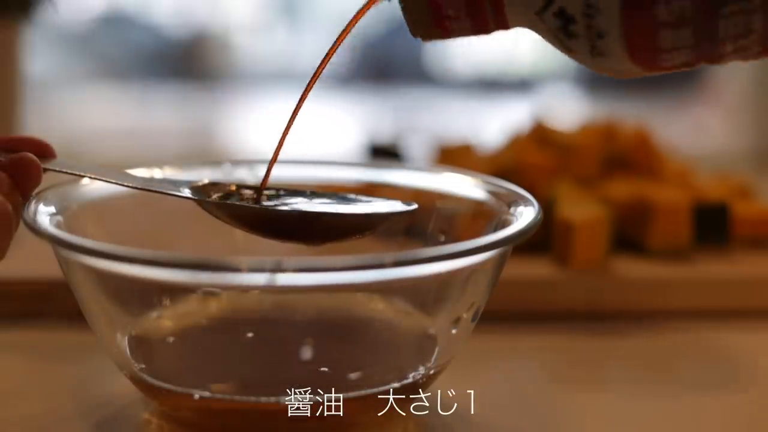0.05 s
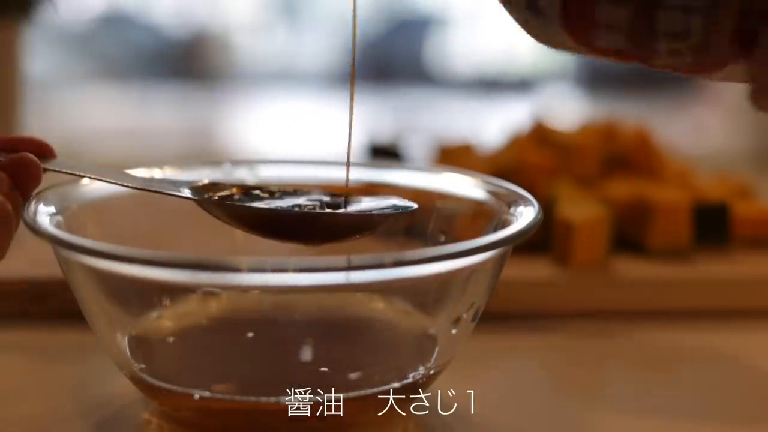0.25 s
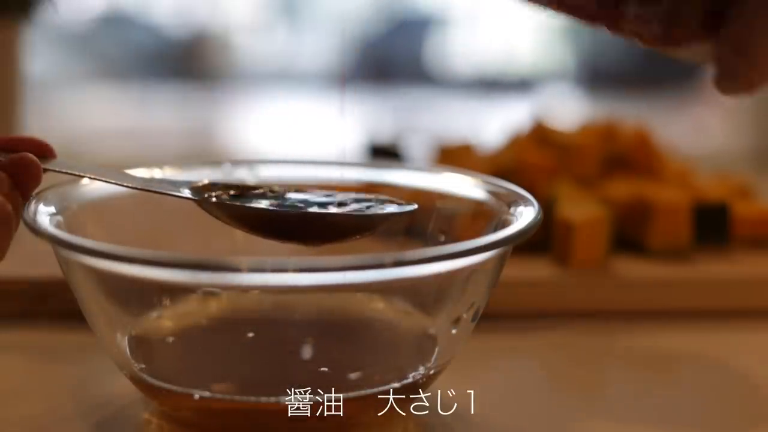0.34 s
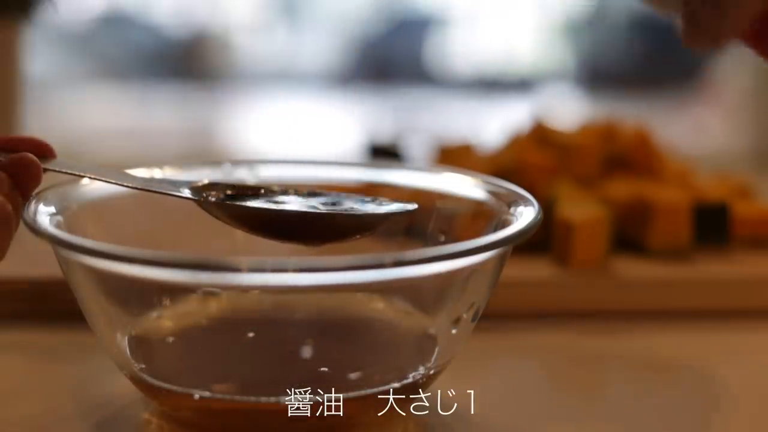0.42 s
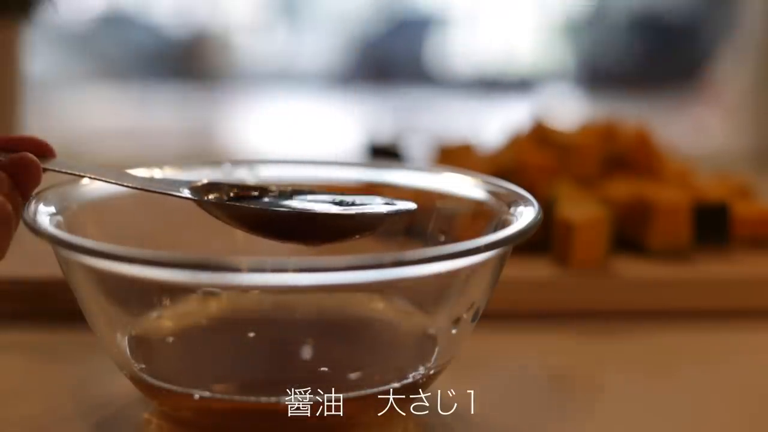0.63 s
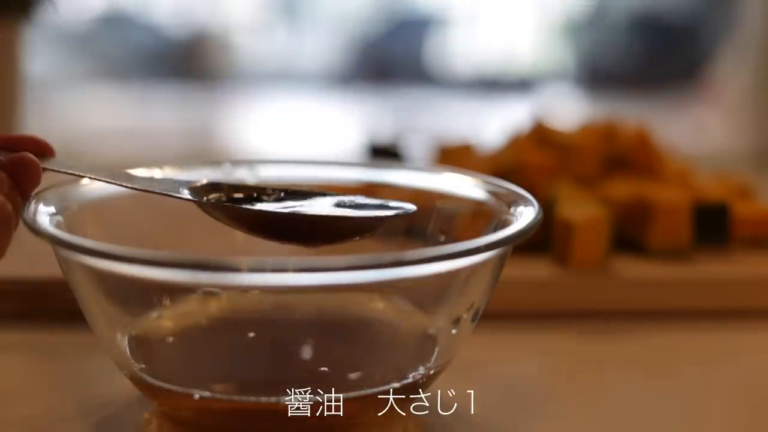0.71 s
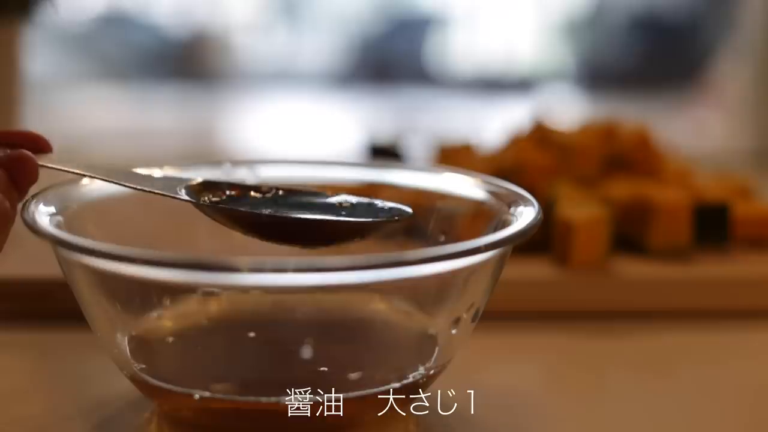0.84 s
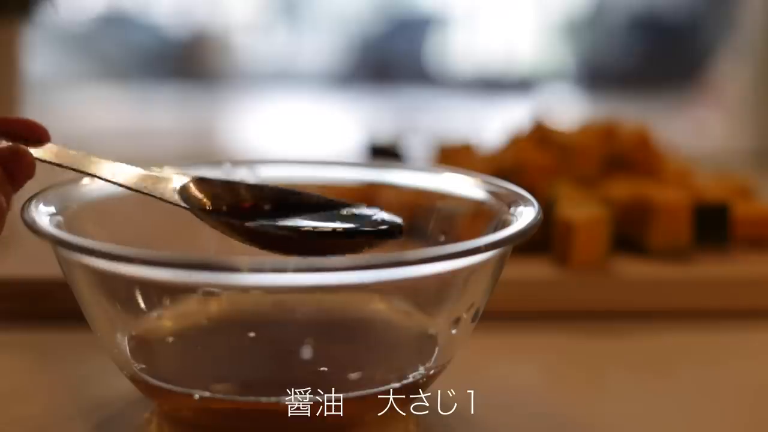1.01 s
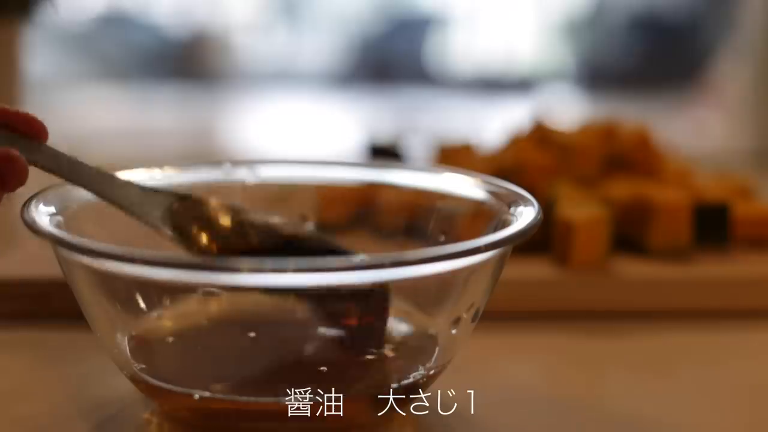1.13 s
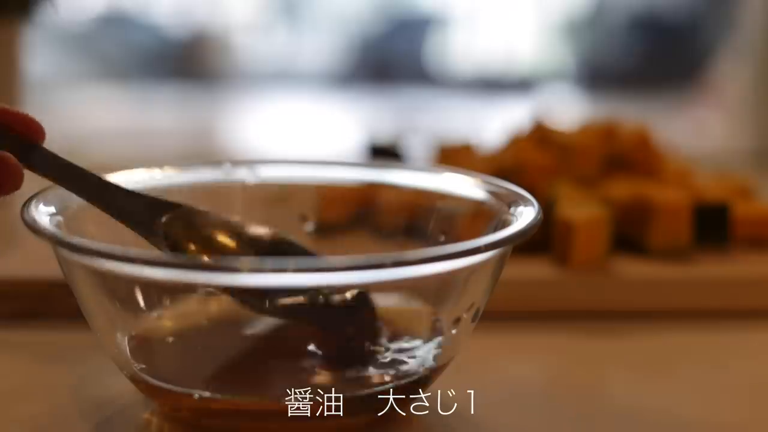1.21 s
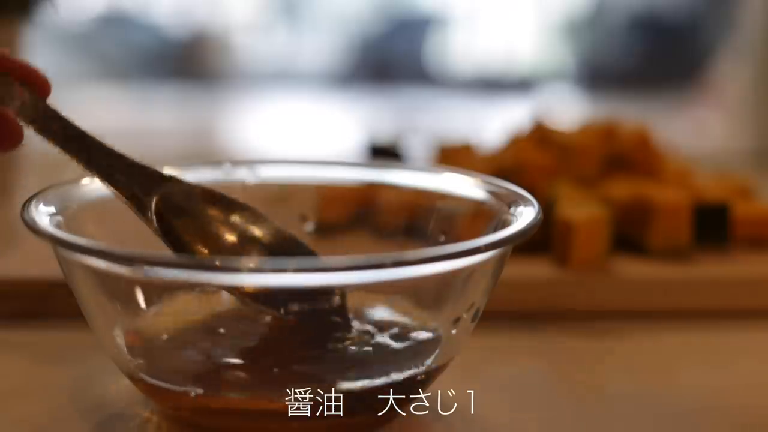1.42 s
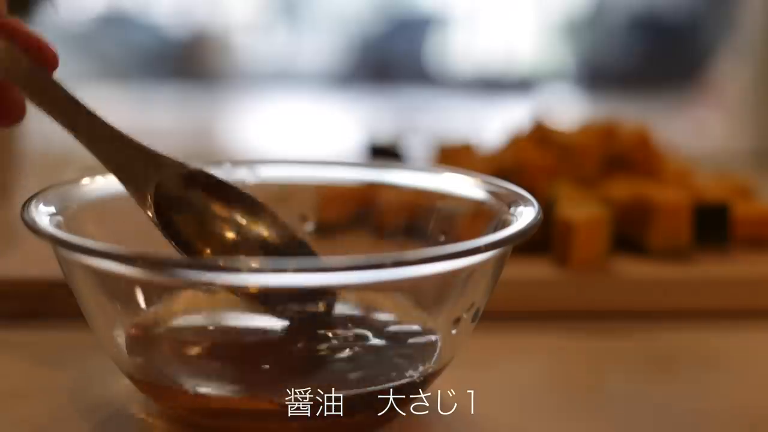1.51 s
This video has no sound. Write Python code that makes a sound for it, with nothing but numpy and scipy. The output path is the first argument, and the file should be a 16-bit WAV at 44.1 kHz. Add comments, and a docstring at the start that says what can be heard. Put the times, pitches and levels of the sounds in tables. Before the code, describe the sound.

Sauce drips wetly into a metal spoon, then the spoon ticks lightly on a glass bowl.

```python
"""First come quick, wet drips: sauce poured into a metal spoon over a glass bowl in a quiet kitchen.
The thinning stream breaks into drips: each lands with a tiny splash and traps a bubble that rings briefly.
The spoon ticks lightly on the glass twice, and at the second tick the spoonful is tipped into the bowl.
Worktop and walls echo these sounds, over a faint appliance hum."""
import sys
import numpy as np
from scipy import signal
from scipy.fft import rfft, irfft
from scipy.io import wavfile

SR = 44100
rng = np.random.default_rng(int(sys.argv[2]) if len(sys.argv) > 2 else 0)


def file_out(sig):
    """Save sig as 16-bit WAV at sys.argv[1]."""
    # one column per channel
    cols = np.atleast_2d(sig).T
    # limit, then scale
    lim = np.clip(cols, -1, 1)
    pcm = np.round(lim * 32767).astype(np.int16)
    wavfile.write(sys.argv[1], SR, pcm)


N = 68355
T = np.arange(N) / SR
HZ = np.maximum(np.fft.rfftfreq(2 * N, 1 / SR), 1)
SIDE = np.array([[1], [-1]])   # add on the left, subtract on the right: widens a sound


def from_db(db):
    """Turn decibels into a factor to multiply by."""
    return 10 ** (np.asarray(db) / 20)


def rms_one(x):
    """Scale a sound so its average strength (rms) is 1."""
    return x / np.sqrt(np.mean(x ** 2) + 1e-20)


def fade(fade_s):
    """A smooth die-away. Every fade time here is the time taken to drop by 60 dB."""
    return np.exp(-np.minimum(np.log(1000) * T / max(fade_s, 1e-4), 30))


def at_hz(table, hz, column=1):
    """Look up a frequency in a table, blending between rows on a pitch scale."""
    table = np.array(table)
    return np.interp(np.log(hz), np.log(table[:, 0]), table[:, column])


def shaped(x, gain):
    """Turn each frequency in HZ up or down by its gain."""
    return irfft(rfft(x, 2 * N) * gain)[:N]


def noise(gain):
    """Steady noise of strength 1, its tone set by the gains."""
    return rms_one(shaped(rng.standard_normal(2 * N), gain))


def add(out, start_s, sound):
    """Mix a sound in at the given time."""
    start = int(np.clip(start_s * SR, 0, N - 1))
    out[start:] += sound[:N - start]


# The tone of the room's air, from low to high: f/Hz, relative level/dB
AIR_TONE = [(20, -17), (45, -8), (80, -9), (130, -6), (260, -4.5), (500, -6.5), (800, -10), (1300, -13),
            (2000, -17), (4000, -28), (8000, -31), (16000, -37)]
# The notes in the appliance's hum: f/Hz, level/dB, width/Hz
HUM_NOTES = [(76.85, -72.5, 4), (220.8, -71.5, 6.7), (247.9, -73, 9), (585.7, -75, 2.8), (1168, -78.5, 4.8)]


def air_and_hum(air_db=-59.5, side_db=-42):
    """A soft rush of air, nearly the same in both ears, and an appliance's wavering hum."""
    tone = from_db(at_hz(AIR_TONE, HZ))
    air = from_db(air_db) * (noise(tone) + from_db(side_db) * noise(tone) * SIDE)
    hum = np.zeros(N)
    for hz, level_db, width_hz in HUM_NOTES:
        peak = 1 / (1 + (2 * (HZ - hz) / width_hz) ** 2)   # noise this narrow sounds like a note
        hum += from_db(level_db) * noise(peak)
    return air + hum


# Quick bounces off the bowl and worktop: delay t/s, level/dB
NEAR_ECHOES = [(.0016, -18), (.0053, -32), (.0083, -20.5)]
# The blur of echoes from the walls: f/Hz, level/dB, fade t/s
WALL_ECHOES = [(1130, -2, 0.36), (2310, -14, 0.4), (3600, -6, 0.32), (5400, -7, 0.27), (8000, -9.5, 0.25),
               (11000, -2.5, 0.21), (15000, -12.5, 0.13)]


def kitchen_echo(sound, near_db=0.5, near_fade_s=0.12, tail_delay_s=0.003):
    """Sound bounces off bowl and worktop, scatters off things nearby and dies away between the walls."""
    size = 16384   # samples in the echo's tail
    spectrum, bins_hz = rfft(rng.standard_normal(size)), np.fft.rfftfreq(size, 1 / SR)
    tail, response = np.zeros(N), np.zeros(N)
    near = fade(near_fade_s)[:size]
    edges_hz = np.geomspace(1000, 18000, 48)
    for low, high in zip(edges_hz, edges_hz[1:]):   # each band fades at its own speed
        hz = np.sqrt(low * high)
        far = fade(at_hz(WALL_ECHOES, hz, column=2))[:size]
        envelope = np.hypot(far / np.linalg.norm(far), from_db(near_db) * near / np.linalg.norm(near))
        band = irfft(spectrum * ((bins_hz >= low) & (bins_hz < high))) * envelope
        share = np.sqrt((high - low) / (SR / 2)) * np.linalg.norm(envelope) / np.linalg.norm(band)
        tail[:size] += from_db(at_hz(WALL_ECHOES, hz)) * share * band
    add(response, tail_delay_s, tail)
    for delay_s, level_db in NEAR_ECHOES:
        add(response, delay_s, from_db(level_db) * (T == 0))
    return signal.fftconvolve(sound, response)[:N]


# The notes the spoon rings with: f/Hz, relative level/dB, fade t/s
SPOON_NOTES = [(6600, -14, 0.0069), (7280, -1, 0.0038), (7865, -0.5, 0.0039), (8600, -15.5, 0.012),
               (13100, -11, 0.0052), (15100, 3.5, 0.0023)]
# Each touch of spoon on glass: t/s, level/dB, treble limit f/Hz
SPOON_TOUCHES = [(0.9505, -13.5, 18000), (1.2696, -19, 8600)]


def spoon_ticks(contact_s=0.00016, lowest_hz=5680, click_db=-27.5, click_fade_s=0.0074):
    """The spoon clicks and rings, hushed by hand and sauce; a softer touch loses the highest notes."""
    ring = sum(from_db(db) * fade(fade_s) * np.sin(2 * np.pi * hz * T) for hz, db, fade_s in SPOON_NOTES)
    ring = ring * (1 - np.exp(-(T / contact_s) ** 2)) + 1e-18   # builds while metal presses on glass
    ring = signal.sosfilt(signal.butter(7, lowest_hz, "high", fs=SR, output="sos"), ring)
    tick = ring + from_db(click_db) * rng.standard_normal(N) * fade(click_fade_s)
    out = np.zeros(N)
    for start_s, level_db, top_hz in SPOON_TOUCHES:
        soften = signal.butter(12, min(top_hz, .45 * SR), fs=SR, output="sos")
        add(out, start_s, from_db(level_db) * signal.sosfilt(soften, tick))
    return out


def bubble(hz, fade_s, swell_cycles=2.2, rise=0.01):
    """A trapped bubble rings with one note that swells quickly and climbs a little as it fades."""
    pitch_hz = hz * (1 + rise * np.minimum(T / fade_s, 2))
    envelope = (1 - np.exp(-(T * hz / swell_cycles) ** 2)) * fade(fade_s)
    return envelope / envelope.max() * np.sin(2 * np.pi * np.cumsum(pitch_hz) / SR)


def tipped_spoonful(start_s=1.2725, bubbles_per_s=3000, ring_cycles=5.8):
    """Sauce lands in the bowl: a fading patter of many tiny bubbles over a soft, low thud."""
    patter_db, patter_fade_s = -50.5, 0.27
    thud_hz, thud_db, thud_fade_s = 229, -53, 0.34
    pitches_hz = np.geomspace(2290, 4860, 12)
    patter, out = np.zeros(N), np.zeros(N)
    for hz in pitches_hz:
        births = rng.random(N) < bubbles_per_s / len(pitches_hz) / SR
        strengths = births * rng.standard_normal(N)
        patter += signal.fftconvolve(strengths, bubble(hz, ring_cycles / hz))[:N]
    add(out, start_s, from_db(patter_db) * rms_one(patter) * fade(patter_fade_s))
    add(out, start_s, from_db(thud_db) * np.sin(2 * np.pi * thud_hz * T) * fade(thud_fade_s))
    return out


# The tone that all splashes share: f/Hz, boost or cut in level/dB
SPLASH_TONE = [(300, -25), (1500, -40), (2600, 0.5), (4200, 5.5), (5300, -7), (6800, -2), (8600, 0),
               (10200, -15), (14000, -7.5), (16000, -19)]
# Each drip of sauce, and at 0.4115 s a quick echo of the loudest drip: t/s, bubble f/Hz,
# bubble level/dB, bubble fade t/s, splash level/dB (before its tone is shaped), splash top f/Hz
DRIPS_AND_ECHO = [ (0.2004, 3344, -34.5, 0.011, -47.5, 8900), (0.2237, 1780, -43.5, 0.028, -42.5, 9000),
                  (0.2253, 3153, -36, 0.02, -69, 8000), (0.2318, 3460, -54, 0.013, -47, 9100),
                  (0.2402, 8500, -35, 0.014, -51, 15000), (0.2495, 9000, -32.5, 0.0033, -40, 12000),
                  (0.2667, 8260, -30.5, 0.0073, -54, 14000), (0.2772, 4810, -26.5, 0.0072, -26, 10700),
                  (0.2879, 5890, -33, 0.011, -33, 12200), (0.4032, 2136, -29, 0.0091, -38, 9000),
                  (0.4054, 2350, -15.5, 0.0081, -30.5, 9700), (0.4064, 3600, -22.5, 0.002, -25.5, 9100),
                  (0.4115, 3600, -26.5, 0.0064, -66, 9000), (0.4190, 13000, -41, 0.0026, -29, 15000),
                  (0.4542, 8070, -40, 0.0099, -36.5, 11000), (0.4667, 3500, -47, 0.0036, -47, 10000),
                  (0.4962, 2010, -42, 0.002, -37.5, 5070), (0.5308, 4330, -54, 0.01, -37.5, 9400),
                  (0.5445, 4330, -52, 0.0044, -41.5, 9100), (0.5902, 5450, -37.5, 0.0039, -32.5, 8000),
                  (0.6240, 3550, -52, .025, -62, 5900), (0.8073, 4520, -50.5, 0.0055, -35.5, 8540),
                  (0.8080, 5900, -45.5, 0.0016, -48, 8900), (0.8760, 8650, -53.5, 0.0047, -60, 10100),
                  (1.2720, 1991, -33.5, 0.048, -35, 6000), (1.2740, 1217, -53, 0.042, -65, 4000),
                  (1.2850, 2110, -36.5, 0.019, -63, 5500), (1.3530, 3370, -51, 0.022, -66, 5000), ]


def drips(tick_fade_s=0.0074, spray_db=-20, spray_fade_s=0.071):
    """Each drip makes a short wet tick, a fine spray and a ringing bubble; small drips tick higher."""
    rings, splashes = np.zeros(N), np.zeros(N)
    for start_s, hz, bubble_db, fade_s, splash_db, top_hz in DRIPS_AND_ECHO:
        add(rings, start_s, from_db(bubble_db) * bubble(hz, fade_s))
        # the tick reaches only a little below its bubble's pitch
        edges_hz = np.clip([0.86 * hz, max(top_hz, 1.1 * hz)], 100, .45 * SR)
        tick_band = signal.butter(3, edges_hz, "band", fs=SR, output="sos")
        hiss = rng.standard_normal(N)
        tick = signal.sosfilt(tick_band, hiss * fade(tick_fade_s))
        spray = from_db(spray_db) * hiss * fade(spray_fade_s)
        add(splashes, start_s, from_db(splash_db) * (tick + spray))
    return rings + shaped(splashes, from_db(at_hz(SPLASH_TONE, HZ)))


def scene(spoon_to_room_db=-2, side_db=-44):
    """Sauce and spoon are straight ahead; the kitchen around them is only slightly wide."""
    sauce, spoon = drips() + tipped_spoonful(), spoon_ticks()
    into_room = sauce + from_db(spoon_to_room_db) * spoon
    side_echo = from_db(side_db) * kitchen_echo(into_room) * SIDE
    return sauce + spoon + kitchen_echo(into_room) + side_echo + air_and_hum()


def record(dry, hiss_db=-69.5, cutoff_hz=16000):
    """Each side gets its own faint microphone hiss, and the highest treble is cut off steeply."""
    hiss = from_db(hiss_db) * rng.standard_normal((2, N))
    treble_cut = signal.ellip(10, .1, 70, cutoff_hz, fs=SR, output="sos")
    return signal.sosfilt(treble_cut, dry + hiss)


dry = scene()
out = record(dry)
file_out(out)
```